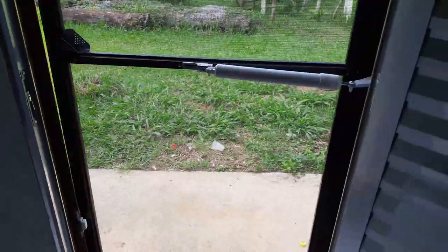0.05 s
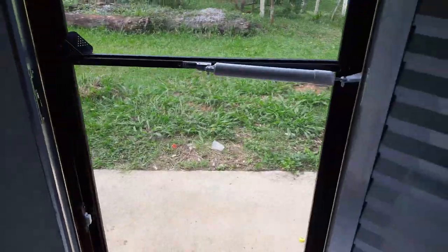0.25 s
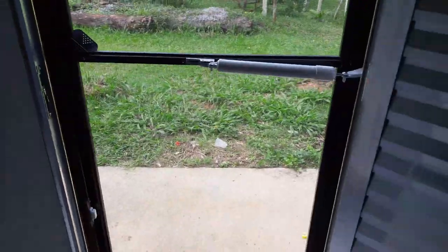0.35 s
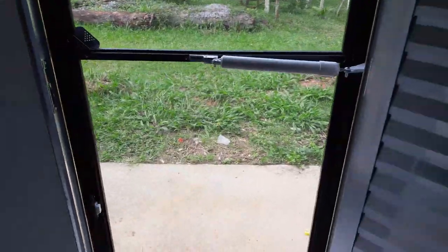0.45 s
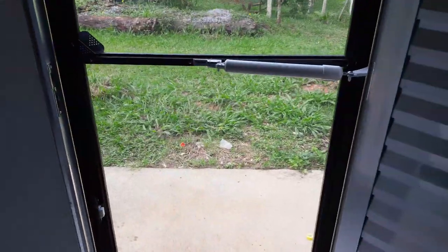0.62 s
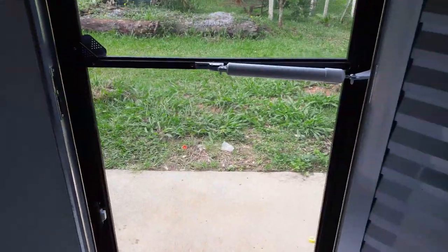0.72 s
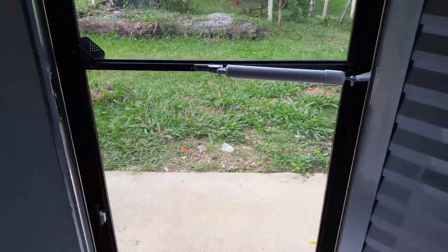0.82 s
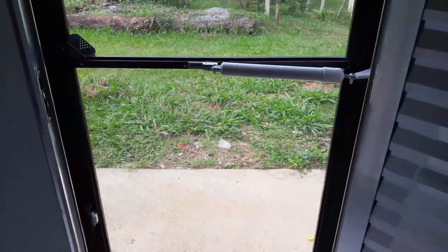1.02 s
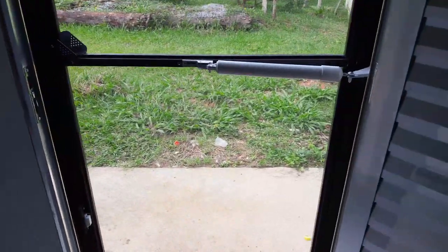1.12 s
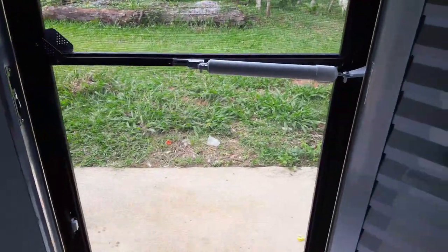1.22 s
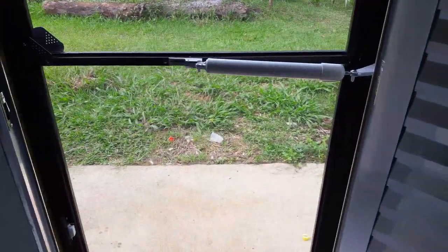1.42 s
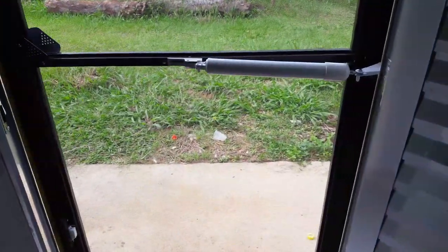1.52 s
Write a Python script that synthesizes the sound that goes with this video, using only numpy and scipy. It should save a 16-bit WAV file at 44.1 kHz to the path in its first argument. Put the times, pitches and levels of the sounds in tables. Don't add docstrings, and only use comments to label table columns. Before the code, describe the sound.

A light metal screen door slams shut with a bright clang and two clattering rebounds in a hard room

```python
import sys
import numpy as np
from scipy import signal
from scipy.fft import rfft, irfft, next_fast_len
from scipy.io import wavfile
from scipy.ndimage import uniform_filter1d

SR = 44100
rng = np.random.default_rng(int(sys.argv[2]) if len(sys.argv) > 2 else 0)


def bounce(signal):
    frames = np.transpose(np.atleast_2d(signal))
    limited = np.clip(frames, -1, 1)
    pcm = np.round(limited * 32767).astype(np.int16)
    wavfile.write(sys.argv[1], SR, pcm)


def gain_from_db(level_db):
    decades = np.asarray(level_db, float) / 20
    return 10 ** decades


N = 68355

# frequency in Hz, level in dB per Hz.
HUSH_COLOR = [(25, -7), (60, 2.5), (200, -1), (500, -3), (1500, -6.5), (3000, -9.5), (8000, -24.5),
              (16000, -4)]
# time in seconds, level in dB.
HUSH_LOUDNESS = [(0, -55), (0.199, -53), (1.102, -57.5), (1.55, -58.5)]
PATCHY_DB = 0.7

TICK_TIMES = [.0254, .0374, .0476, .0488, .0973, .1075, .1407, 1.2995, 1.3012, 1.3102, 1.3119, 1.3320,
              1.3330]
# knock in dB, snap in dB, knock pitch in Hz, dull after-swing in dB.
FINGER_TICKS = [(-37.5, -62, 520, -38.5), (-46, -41, 900, -74), (-63, -56, 550, -55),
                (-31.5, -26, 825, -39.5), (-39, -60, 430, -39.5), (-55.5, -69, 1300, -47),
                (-36, -37, 790, -53), (-52, -57.5, 1200, -69.5), (-50, -61.5, 820, -71.5),
                (-48, -39, 760, -68), (-63, -41, 920, -70), (-67.5, -42, 570, -60.5),
                (-28, -17.5, 1016, -37)]
# frequency in Hz, gain in dB.
CASE_PATH = [(60, -19.5), (250, -1), (1500, -1), (3000, 10), (4500, 9.5), (6600, -6), (9000, 10),
             (16000, 15)]
KNOCK_CYCLES, AFTER_CYCLES = 4.4, 8
SNAP_T60_S = 0.0015

# time in seconds, hiss in dB, squeak in dB.
LATCH_SCRAPE = [
    (0.182, -63, -82),
    (.1965, -68, -76),
    (.198, -58.5, -83.5),
    (0.201, -67, -75),
    (0.202, -52, -65.5),
    (0.21, -52, -49.5),
    (.214, -57.5, -44.5),
    (0.223, -60, -49.5),
]
SQUEAK_HZ, SQUEAK_WIDTH_HZ = 880, 250

# frequency in Hz, time to fall 60 dB in seconds.
ROOM_DECAY = [(60, 1.07), (200, 0.7), (1100, 0.57), (2900, 0.46), (4500, 0.55), (7000, 0.49), (8500, 0.52),
              (15000, 0.39)]
ROOM_DELAY_S, ROOM_BUILD_S = 0.0034, 0.001
WET_RING_DB, WET_BUZZ_DB, WET_RATTLE_DB, WET_PANEL_DB = -5.5, 4, -10, -4.5
AIR_HZ, AIR_LOSS = 7570, 1.35

# start in seconds, frame ring in dB, latch rattle in dB, panel thud in dB,
# hardness in dB per octave.
DOOR_CONTACTS = [(0.2214, -31.5, -15, -39, -11.5), (0.225, -6.5, -10.5, -28.5, -0.5),
                 (0.2309, -9.5, -19, -21.5, -2), (0.2453, -14, -16, -24.5, -5.5),
                 (0.2521, -21, -14.5, -38, 6.3), (0.258, -18, -17.5, -40, 2.5), (.2690, -16, -31, -20, -7),
                 (.2870, -41, -27, -27.5, 10.5), (0.5728, -16, -9, -30, -1.5),
                 (.5745, -17.5, -13.5, -29, 1.5), (.5800, -10.5, -21.5, -38, -1.5),
                 (0.601, -32.5, -30, -35, 5.2), (0.6207, -31, -18.5, -46.5, -5.7),
                 (0.6275, -25.5, -31.5, -33.5, -7.9), (.7200, -30.5, -54, -40, -2.5),
                 (.7783, -18.5, -16, -39, 4), (0.781, -24.5, -20, -38, -0.5),
                 (0.7859, -31.5, -53, -52, 5.5)]
# frequency in Hz, level in dB, time to fall 60 dB in seconds.
FRAME_MODES = [(629.7, -10.5, 0.097), (775.7, -5.5, 0.062), (1122.6, 1.5, .05), (1312, 0.5, 0.051),
               (1406, 1, 0.05), (1562, 7, 0.025), (1580, -14.5, 0.018), (1875, -9.5, 0.013),
               (2090, -6, 0.068), (2320, -19, .025), (2464, -6.5, 0.0083), (2830, -0.5, .02)]
# frequency in Hz, level in dB, time to fall 60 dB in seconds.
PANEL_MODES = [(62.16, -19, .9), (80, -12, 0.35), (105, -13, 0.45), (141.5, -9.5, 0.35),
               (162.6, -0.5, 0.13), (283.4, 1, .12), (313.1, -3.5, 0.19), (403.3, -3.5, 0.1)]
# frequency in Hz, level in dB per Hz.
BUZZ_COLOR = [(150, -32), (500, -16), (980, -15), (1180, -1.5), (1800, -1.5), (2600, -8), (4000, -11),
              (9000, -28)]
BUZZ_DB, BUZZ_T60_S = -7, 0.023
RATTLE_T60_S, RATTLE_LOW_HZ = 0.043, 2700
FRAME_RISE_S, PANEL_RISE_S = 0.00049, 0.0036
MODE_SPREAD_DB = 3
TILT_PIVOT_HZ = 1490

# frequency in Hz, gain in dB.
MIC_COLOR = [(2700, 2), (3600, -7.5), (4800, -7.5), (6600, 8.5), (7400, 0.5), (8200, -14.5), (10500, -16.5),
             (15000, -20.5)]
PORT_HZ, PORT_WIDTH_HZ, PORT_DB = 12520, 720, 6
LOW_CUT_HZ, TOP_HZ = 55, 15850
SELF_NOISE_DB = -84.5


def unit(x):
    return x / np.sqrt(np.mean(x ** 2) + 1e-20)


def along(points, hz):
    f, v = np.transpose(points)
    return np.interp(np.log(hz + 1), np.log(f + 1), v)


def causal(x, gain_db):
    m = 2 * next_fast_len(x.shape[-1])
    cep = irfft(gain_db(np.fft.rfftfreq(m, 1 / SR)) * np.log(10) / 20, m)
    cep[1:m // 2] *= 2
    cep[m // 2 + 1:] = 0
    return irfft(rfft(x, m) * np.exp(rfft(cep)), m)[..., :x.shape[-1]]


def add(track, s, sound):
    part = track[round(s * SR):][:len(sound)]
    part += sound[:len(part)]


def hush():
    z = signal.stft(rng.standard_normal(N + 512), nperseg=512)[2]
    field = uniform_filter1d(rng.standard_normal(z.shape), 8, 0)
    field = uniform_filter1d(field, 8, 1)
    noise = signal.istft(z * gain_from_db(PATCHY_DB * unit(field)), nperseg=512)[1][:N]
    air = causal(noise, lambda hz: along(HUSH_COLOR, hz))
    return unit(air) * gain_from_db(np.interp(np.arange(N) / SR, *np.transpose(HUSH_LOUDNESS)))


def ticks():
    out = np.zeros(N)
    t = np.arange(SR // 40) / SR
    for s, (knock_db, snap_db, hz, after_db) in zip(TICK_TIMES, FINGER_TICKS):
        knock = np.cos(2 * np.pi * hz * t - 0.3) * gain_from_db(knock_db - 60 * t * hz / KNOCK_CYCLES)
        knock = knock * (1 - np.exp(-t / 0.0001))
        after = np.sin(np.pi * hz * t) * gain_from_db(after_db - 60 * t * hz / 2 / AFTER_CYCLES)
        snap = (t == 0) + 0.62 * rng.standard_normal(len(t)) * gain_from_db(-60 * t / SNAP_T60_S)
        snap = snap - 0.52 * np.roll(snap, shift=3)
        add(out, s, 2 * knock + after + gain_from_db(snap_db) * snap)
    return causal(out, lambda hz: along(CASE_PATH, hz))


def scrape():
    s, hiss_db, squeak_db = np.transpose(LATCH_SCRAPE)
    t = np.arange(N) / SR
    on = (t > s[0]) & (t < s[-1])
    roughness = uniform_filter1d(rng.standard_normal(N), 60) * np.sqrt(60)
    grit = rng.standard_normal(N) * gain_from_db(2.5 * roughness)
    peak = lambda hz: -20 * np.log10(1 + ((hz - SQUEAK_HZ) / SQUEAK_WIDTH_HZ) ** 2)
    squeak = causal(rng.standard_normal(N), peak)
    hiss = gain_from_db(np.interp(t, s, hiss_db)) * unit(grit)
    return on * (hiss + gain_from_db(np.interp(t, s, squeak_db)) * unit(squeak))


def room(x):
    hz, _, z = signal.stft(rng.standard_normal(SR), SR, nperseg=256)
    fade = gain_from_db(-60 * np.arange(z.shape[1]) * 0 - 60 * _ / along(ROOM_DECAY, hz)[:, None] + 60)
    tail = signal.istft(z * fade, SR, nperseg=256)[1]
    late = np.clip(np.arange(len(tail)) / SR - ROOM_DELAY_S, 0, None)
    tail = tail * (1 - np.exp(-late / ROOM_BUILD_S))
    return signal.fftconvolve(x, tail / np.linalg.norm(tail))


def ring(modes, t, rise_s):
    hz, db, t60 = np.transpose(modes)[:, :, None]
    chance = rng.standard_normal((2, len(modes), 1))
    level = gain_from_db(db + MODE_SPREAD_DB * chance[0] - 60 * t / t60)
    waves = level * np.sin(2 * np.pi * hz * (1 + 0.015 * chance[1]) * t)
    return waves.sum(0) * (1 - np.exp(-t / rise_s)) / np.sqrt(len(modes))


def frame_buzz(t):
    noise = causal(rng.standard_normal(len(t)), lambda hz: along(BUZZ_COLOR, hz))
    return unit(noise) * gain_from_db(BUZZ_DB - 60 * t / BUZZ_T60_S)


def latch_rattle(t):
    steep = lambda hz: -20 * np.log10(1 + (RATTLE_LOW_HZ / (hz + 1)) ** 2)
    return causal(rng.standard_normal(len(t)) * gain_from_db(-60 * t / RATTLE_T60_S), steep)


def door():
    out = np.zeros(N)
    t, long = np.arange(SR // 4) / SR, np.arange(SR) / SR
    for s, frame_db, rattle_db, thud_db, hard_db in DOOR_CONTACTS:
        tilt = lambda hz: hard_db * np.log2(np.clip(hz, 400, 3200) / TILT_PIVOT_HZ)
        air = lambda hz: -AIR_LOSS * hard_db * (hz > AIR_HZ)
        struck = np.array([ring(FRAME_MODES, t, FRAME_RISE_S), frame_buzz(t)])
        tones, buzz = gain_from_db(frame_db) * causal(struck, tilt)
        panel = gain_from_db(thud_db) * ring(PANEL_MODES, long, PANEL_RISE_S)
        rattle = gain_from_db(rattle_db) * latch_rattle(t)
        wet = gain_from_db(WET_PANEL_DB) * panel
        add(wet, 0, gain_from_db(WET_RING_DB) * tones + gain_from_db(WET_BUZZ_DB) * buzz)
        add(wet, 0, gain_from_db(WET_RATTLE_DB) * causal(rattle, air))
        for sound in (tones + buzz + rattle, panel, room(wet)):
            add(out, s, sound)
    return out


def scene():
    return (hush() + ticks() + scrape() + door())[None]


def band_limit(x):
    return signal.sosfilt(signal.butter(12, 16980, fs=SR, output="sos"), x)


def record(dry):
    def color(hz):
        port = PORT_DB / (1 + ((hz - PORT_HZ) / PORT_WIDTH_HZ) ** 2)
        top_cut = 40 / (1 + (TOP_HZ / (hz + 1)) ** 150)
        low_cut = 20 * np.log10(1 + (LOW_CUT_HZ / (hz + 1)) ** 2)
        return along(MIC_COLOR, hz) + port - top_cut - low_cut

    mix = causal(dry, color) + gain_from_db(SELF_NOISE_DB) * rng.standard_normal(dry.shape)
    return band_limit(mix)


dry = scene()
out = record(dry)
bounce(out)
```